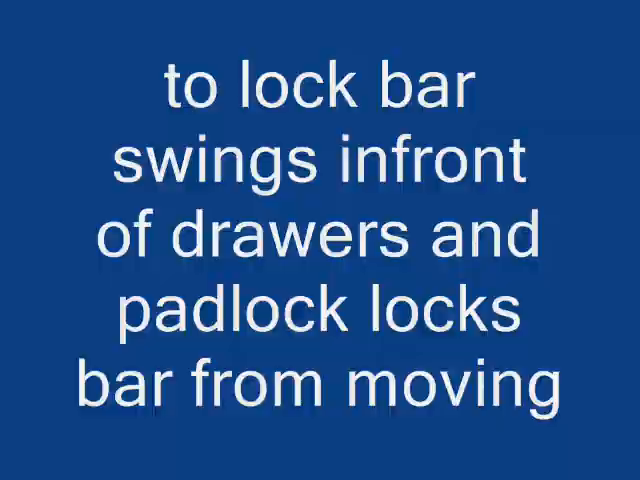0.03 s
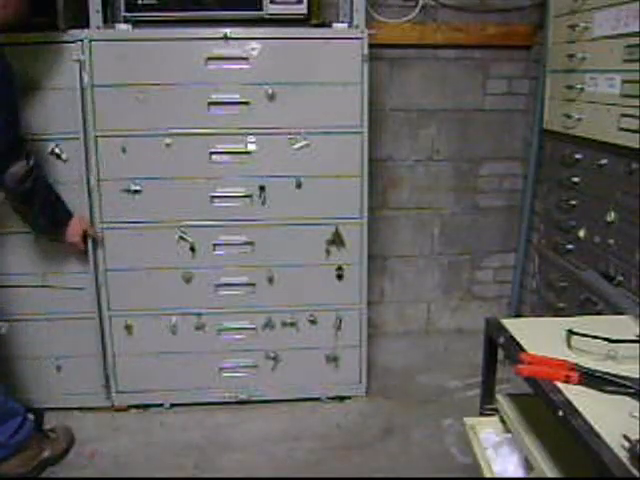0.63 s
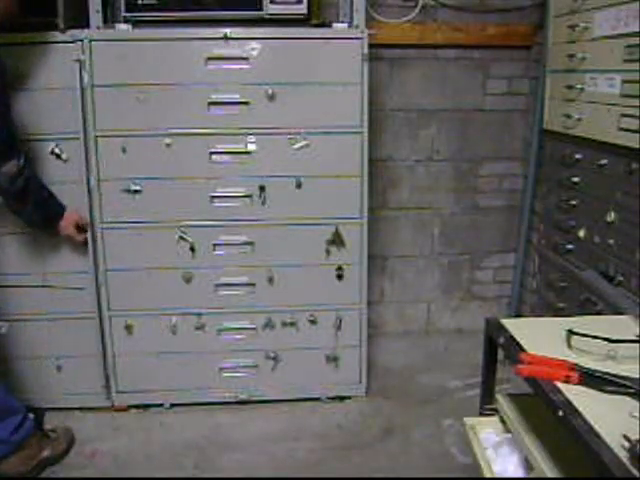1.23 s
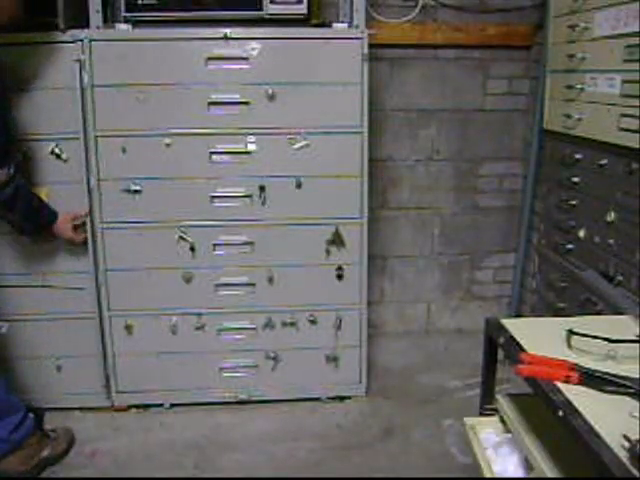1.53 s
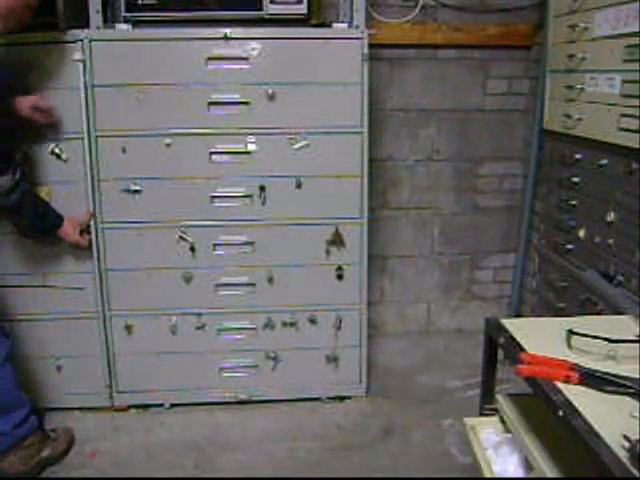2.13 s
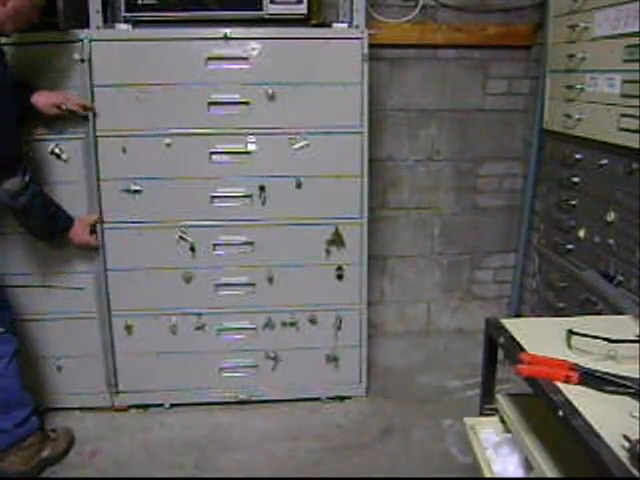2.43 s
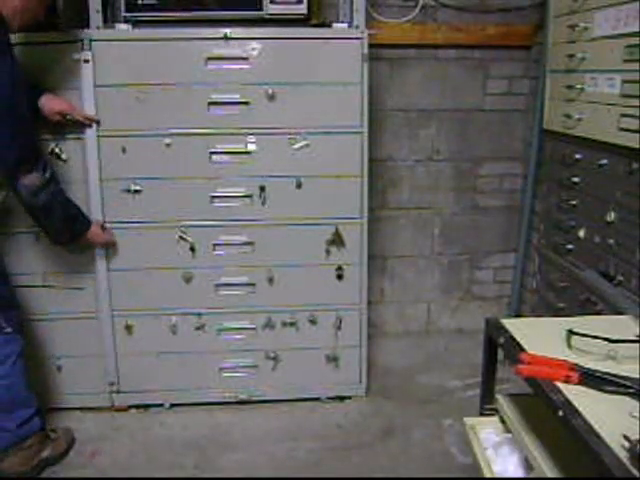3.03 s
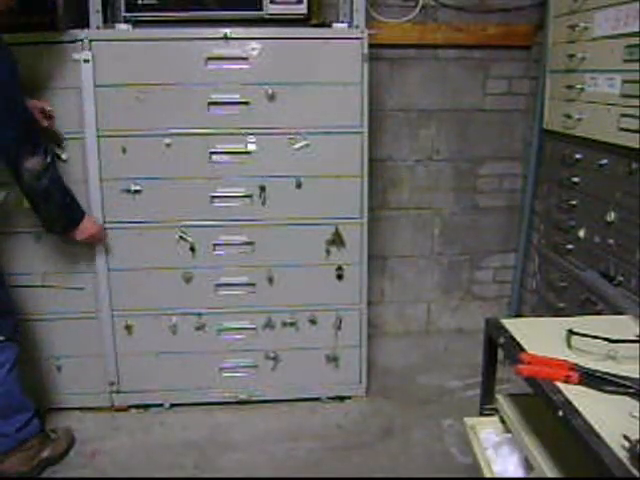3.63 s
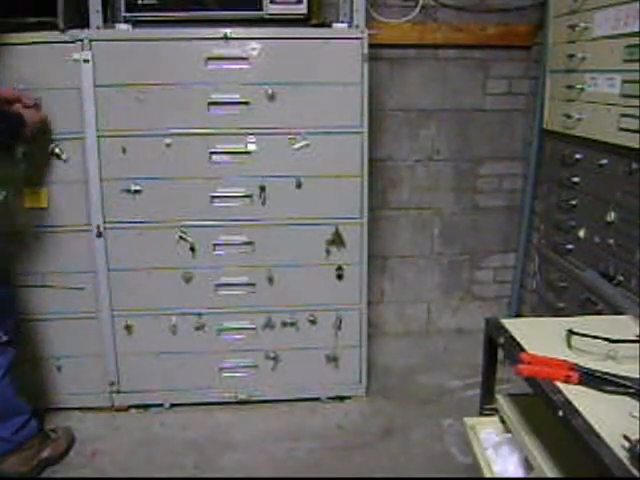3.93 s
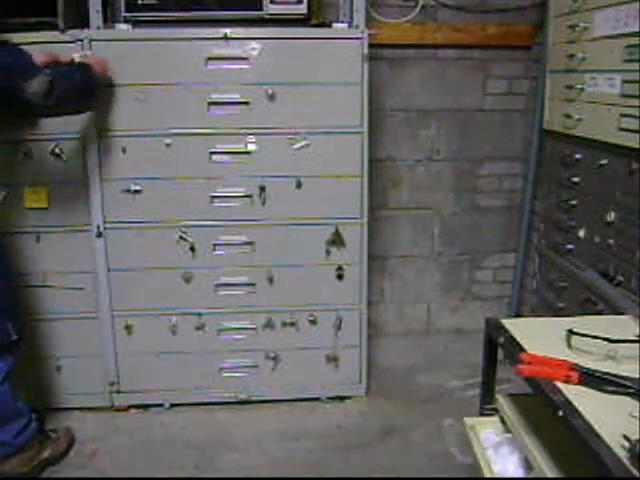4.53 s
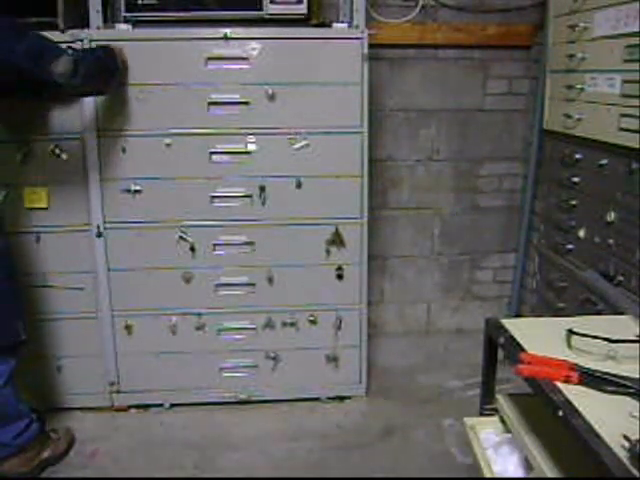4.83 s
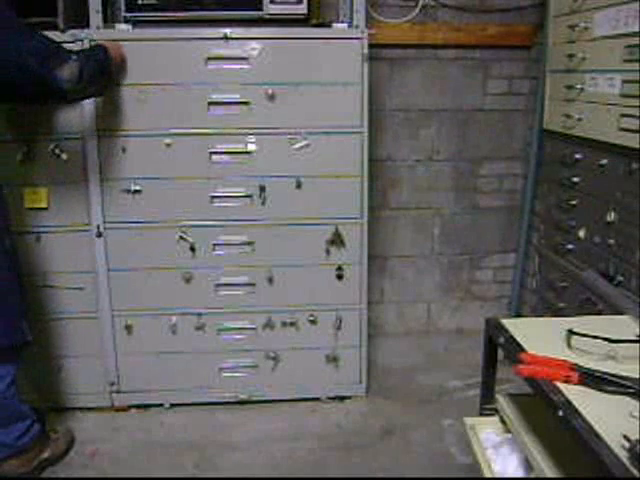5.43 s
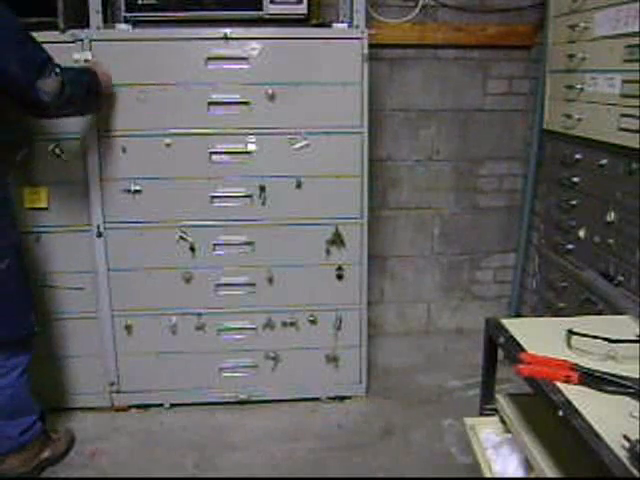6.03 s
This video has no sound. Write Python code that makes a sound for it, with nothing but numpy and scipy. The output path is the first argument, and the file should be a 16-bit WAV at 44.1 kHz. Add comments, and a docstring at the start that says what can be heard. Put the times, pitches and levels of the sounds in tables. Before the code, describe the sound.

In a hard-walled workshop, a fan runs and a low motor hum throbs. After a brief fading rush, a steel bar bangs twice against a metal cabinet, rattling the drawers, with light clicks between the blows. The hasp clacks, and a padlock is fitted with small metallic ticks that build to a sharp final clack. The low-quality microphone overloads on the heavy blows and adds a harsh edge.

```python
"""Barring and padlocking a steel cabinet

A steel security bar swings against a sheet-metal drawer cabinet, is pushed onto its hasp and padlocked.
Each knock rattles the cabinet and rings in a block-walled workshop, over a fan and a beating motor hum.
A small camera with a low sample rate starts on a fading rush and overloads on the heavy blows."""
import sys
import numpy as np
from scipy import signal
from scipy.fft import rfft, irfft
from scipy.io import wavfile
from scipy.ndimage import uniform_filter1d

SR = 44100
rng = np.random.default_rng(int(sys.argv[2]) if len(sys.argv) > 2 else 0)


def generate_wav(signal):
    """Clip the signal to [-1, 1] and save it as 16-bit WAV at the path in sys.argv[1]."""
    frames = np.transpose(np.atleast_2d(signal))
    scaled = np.clip(frames, -1, 1) * 32767
    pcm = np.round(scaled).astype(np.int16)
    wavfile.write(sys.argv[1], SR, pcm)


N = 277830
TIME = np.arange(N) / SR
START_S = 0.2285  # camera on
NOISE_TOP_HZ = 6050


def amp(db):
    """Decibels to gain."""
    return 10 ** (np.asarray(db) / 20)


def unit(x):
    """Scale to rms 1."""
    return x / np.sqrt(np.mean(x ** 2) + 1e-20)


def curve(points, hz):
    """Interpolate (Hz, value) points over log frequency."""
    point_hz, value = np.transpose(points)
    return np.interp(np.log(hz + 1), np.log(point_hz + 1), value)


def decay(t, t60_s):
    """Exponential fall, 60 dB in t60_s."""
    return np.exp(-np.log(1000) * t / t60_s)


def add(mix, at_s, sound):
    """Mix a sound in at at_s."""
    part = mix[round(at_s * SR):][:len(sound)]
    part += sound[:len(part)]


def lowpass(x, hz, taps):
    """Linear-phase low-pass."""
    return signal.oaconvolve(x, signal.firwin(taps, hz, window=("kaiser", 8), fs=SR), "same")


def noise(spectrum, peaks):
    """Steady noise, rms 1: broad spectrum plus narrow resonances."""
    hz = np.fft.rfftfreq(N, 1 / SR)
    peaks_db = sum(db / (1 + (2 * (hz - centre_hz) / width_hz) ** 2) for centre_hz, width_hz, db in peaks)
    gain = amp(curve(spectrum, hz) + peaks_db) * (hz < NOISE_TOP_HZ)
    return unit(irfft(rfft(rng.standard_normal(N)) * gain, N))


def fan(level_db=-32.5):
    """Steady fan noise with resonances."""
    # broad spectrum: (frequency [Hz], relative density [dB])
    spectrum = [(20, -12), (45, -12.5), (100, -10.5), (140, 2), (230, 3), (330, 0), (600, 2.5),
                (1080, -2.5), (1280, -8), (2000, -9), (2700, -15), (4200, -12), (5200, -15)]
    # resonances: (centre [Hz], width [Hz], boost [dB])
    peaks = [(72.6, 15, 15), (234, 34.5, 7.4), (242.7, 2.7, 2.7), (312, 6.8, 5.8), (368, 10.4, 6.7),
             (717, 16, 5.2), (802, 15, 8.9), (1111, 89, 10.2), (1814, 19, 9.6)]
    return amp(level_db) * noise(spectrum, peaks)


def motor_hum(hz=155.8, wander_hz=1.21, level_db=-43, beat_hz=1.68, beat_depth=0.74, crest_s=0.598):
    """Motor tone that beats slowly and wanders in pitch."""
    beat = 1 + beat_depth * np.cos(2 * np.pi * beat_hz * (TIME - crest_s))
    pitch_hz = hz + wander_hz * unit(uniform_filter1d(rng.standard_normal(N), size=6000))
    return amp(level_db) * beat * np.sin(2 * np.pi * np.cumsum(pitch_hz) / SR)


def whine():
    """Faint, steady high tones."""
    # sines: (frequency [Hz], rms level [dB])
    tones = [(4005, -59), (5001, -61.5)]
    return sum(amp(db) * unit(np.sin(2 * np.pi * hz * TIME)) for hz, db in tones)


def rush(level_db=-20, fade_db_per_s=33, swell_db=5, swell_at_s=0.627, swell_half_width_s=0.067):
    """Hollow, faintly ringing rush; swells once as it fades."""
    # broad spectrum: (frequency [Hz], relative density [dB])
    spectrum = [(100, -21.5), (300, -13.5), (580, -11.5), (720, -8.5), (1110, -10), (1250, -10),
                (1900, -17.5), (3200, -21.5), (4200, -20), (5200, -25)]
    # resonances: (centre [Hz], width [Hz], gain [dB])
    peaks = [(694, 27, 11), (790, 39, 8), (848, 22, 15), (996, 44, 8.5), (1094, 37, 16.5), (2900, 48, 11.5),
             (3560, 60, -4), (3720, 70, 6), (4000, 62, 7), (4140, 45, 2)]
    fade_db = fade_db_per_s * np.maximum(TIME - START_S, 0)
    swell = np.exp(-((TIME - swell_at_s) / swell_half_width_s) ** 2)
    return amp(level_db - fade_db + swell_db * swell) * noise(spectrum, peaks)


def ring(modes, spread_db=1.5, rise_s=0.00087, wobble_hz=11):
    """Modes of a steel part; weights vary per strike, pitch wavers slightly as heard through the room."""
    hz, db, t60_s = np.transpose(modes)[:, :, None]
    t = TIME[:SR]
    wobble = np.repeat(rng.standard_normal((len(hz), 100)), SR // 100, axis=1)  # 10 ms steps
    cycles = np.cumsum(hz + wobble_hz * wobble, axis=1) / SR + rng.random(hz.shape)
    weights = amp(db - spread_db * rng.standard_normal(hz.shape))
    waves = np.sin(2 * np.pi * cycles) * decay(t, t60_s)
    attack = 1 - np.exp(-t / rise_s)
    return (weights * waves).sum(0) / np.sqrt(np.sum(weights ** 2) / 2) * attack


def ping(hz, spread=0.0462, count=5, t60_s=0.085):
    """Small struck part: a tight cluster of short modes."""
    offsets = np.linspace(-1, 1, count) + rng.uniform(-0.24, 0.32, count)
    return ring([(mode_hz, 0, t60_s) for mode_hz in hz * (1 + spread * offsets)])


def snap(band_hz=(3600, 5300), t60_s=0.019):
    """Brief, bright crack of steel meeting steel."""
    band = signal.butter(3, band_hz, "bandpass", fs=SR, output="sos")
    age = np.log(1000) * TIME[:SR] / t60_s  # in time constants
    return unit(signal.sosfilt(band, rng.standard_normal(SR))) * age * np.exp(1 - age)


def contact_db(hz, thud_db, clang_db, edge_db):
    """Spectral tilt set by where and how squarely a blow lands."""
    tilt = [(500, thud_db), (1150, clang_db), (1550, clang_db), (2400, 0), (3200, 0), (4500, edge_db)]
    return curve(tilt, hz)


def clatter(thud_db, clang_db, edge_db, rise_s=0.00022, t60_s=0.17, room_db=-7, room_rise_s=0.012):
    """Dense, short sheet-metal modes plus a room tail, longest in the bass."""
    # sheet steel in the room: (band centre [Hz], relative density [dB], room t60 [s])
    bands = [(40, -32, .35), (80, -17, 0.88), (141, -1, 0.69), (252, -11, 1.15), (410, 0, 0.87),
             (870, -0.5, 0.85), (1375, 7.5, 0.29), (2000, -0.5, 0.47), (2980, 3.5, 0.39), (3580, 1, 0.38),
             (3900, 4.5, 0.47), (4770, 2.5, 0.33)]
    centres_hz, steel_db, room_t60s = np.transpose(bands)
    t, hz = TIME[:SR], np.fft.rfftfreq(SR, 1 / SR)
    colour = amp(curve(np.c_[centres_hz, steel_db], hz)) * (hz < NOISE_TOP_HZ)
    contact = amp(contact_db(hz, thud_db, clang_db, edge_db))
    spectrum = rfft(rng.standard_normal(SR)) * unit(colour) * contact
    direct = decay(t, t60_s)
    out = np.zeros(SR)
    for share, room_t60_s in zip(np.eye(len(bands)), room_t60s):
        band = irfft(spectrum * curve(np.c_[centres_hz, share], hz), SR)
        room = amp(room_db) * (1 - np.exp(-t / room_rise_s)) * decay(t, room_t60_s)
        out += band * np.hypot(direct, room)
    return out * (1 - np.exp(-t / rise_s))


def hasp_knock(thud_db, clang_db, edge_db, snap_db=-6, ring_db=-9):
    """One contact on the hasp: drawer-front clatter, crack and ring."""
    # modes of hasp and drawer fronts: (frequency [Hz], relative level [dB], t60 [s])
    hasp_modes = [(1125, 5.5, 0.82), (1224, 6, 0.3), (1340, -4, 0.08), (1390, 2, 0.43), (1630, -1, 0.4),
                  (1690, 7.5, 0.49), (1900, -11, 0.088), (2300, 12, 0.4), (2500, 2, 0.7),
                  (2697, 16.5, 0.25), (3310, 15.5, 0.3), (4030, -4, 0.37), (4070, 22, 0.24),
                  (4330, -17.5, .3), (4700, -28, .22), (4860, -28, .22)]
    tilted = [(hz, db + contact_db(hz, thud_db, clang_db, edge_db), t60_s) for hz, db, t60_s in hasp_modes]
    drawers = clatter(thud_db, clang_db, edge_db, rise_s=0.00085)  # slower to start rattling
    return drawers + amp(snap_db + edge_db) * snap() + amp(ring_db) * ring(tilted)


def padlock(settle_s=0.008, settle_thud_db=2.5, settle_edge_db=-3.5):
    """Hasp and padlock parts strike and ping, then settle with a duller knock."""
    # contacts: (time [s], level [dB], settling knock [dB], low thud [dB], mid clang [dB],
    # bright edge [dB], ping pitch [Hz], ping [dB])
    clicks = [(2.113, -35, -11, 7, 7, -9, 2500, -4), (2.170, -20.5, -1.5, 3.5, 0, -5.5, 2870, -1),
              (2.418, -33, 0, -12, -4, 2, 3970, 2), (3.354, -27, 8, -4, 6, 5, 1390, -1),
              (3.368, -10, -3, 0, 2.5, 5.5, 5120, 6), (3.682, -30, -15, -11, -1, -2.5, 1434, 2.5),
              (4.728, -30.5, -5, 13, 8, 1.5, 1400, -13), (4.843, -25, -21, 7, 0, 2, 4340, 3),
              (5.115, -20.5, -3, 6.5, 6, 6.5, 5000, 4), (5.297, -35, -5, 13, 9.5, 1.5, 1420, -6),
              (5.464, -33.5, -4, -14, 7, -5, 4460, 0), (5.537, -24.5, -12, 6, 5.5, 4.5, 1374, 4.5),
              (5.824, -31, 1.5, 10, 16, 6.5, 1596, 0), (5.846, -15.5, 7.5, 0.5, 2, 7, 5100, 9),
              (6.072, -38.5, -8, -4, 13, 8, 4330, -8), (6.108, -17, 2.5, -6, 2.5, 5, 4740, 3),
              (6.157, -7.5, -5, 0, -1.5, 1.5, 1940, -2)]
    out = np.zeros(N)
    for at_s, db, settle_db, thud_db, clang_db, edge_db, ping_hz, ping_db in clicks:
        strike = hasp_knock(thud_db, clang_db, edge_db) + amp(ping_db) * ping(ping_hz)
        settle = hasp_knock(thud_db + settle_thud_db, clang_db, edge_db + settle_edge_db)
        add(out, at_s, amp(db) * strike)
        add(out, at_s + settle_s, amp(db + settle_db) * settle)
    return out


def security_bar(contacts=4, snap_db=-12):
    """Each blow is a quick run of rebounds; side panel and bar ring on."""
    # bar on cabinet: (time [s], level [dB], rebound gap [s], change per rebound [dB], low thud [dB],
    # mid clang [dB], bright edge [dB], panel ring [dB], bar ring [dB])
    blows = [(0.992, -17, 0.0094, 0, -5, 5.5, -10, -7, -11), (1.035, 5.5, .011, -4, 0.5, -3, 0, -7.5, -20),
             (2.617, -16, .003, -2.5, 4, 2, -1, -22, 1), (2.628, -4, .016, -0.5, 2, -1.5, 5.5, -11.5, -4),
             (2.718, -16, .0038, 2.5, -17, 1, 3, -29, -19)]
    # side panel modes: (frequency [Hz], relative level [dB], t60 [s])
    panel_modes = [(356, -15, .7), (433, -13, .55), (480, -14, .65), (525, -14, .5), (574, -14, .5),
                   (700, -14, .55), (1077, -17, .7), (1865, -10, .3), (2218, -11, .4), (2589, -11, .4),
                   (2700, -5, .28), (2723, -2, .28), (2785, -4, .28), (2907, -3, .3), (3140, -7, .3),
                   (3336, -3, .29), (3622, -5, .28), (3821, -6, .28), (3931, 0, .33), (3962, -4, .28),
                   (4032, -5, .35), (4112, -2, .3), (4231, -6, .3), (4345, -5, .3)]
    # bar modes: (frequency [Hz], relative level [dB], t60 [s])
    bar_modes = [(1021, 0, .35), (1080, -5, .35), (1440, 0, .4), (1513, -4, .35), (2698, -3, .35),
                 (2885, -9, .45), (3305, -4, .3), (3521, -3, .3), (3946, -4, .3), (4074, -2, .28),
                 (4120, -3, .28), (4268, 1, .3), (4338, -3, .3), (4581, 3, .3), (4868, -1, .28),
                 (4898, 0, .28), (4932, -2, .28)]
    out = np.zeros(N)
    for at_s, db, gap_s, change_db, thud_db, clang_db, edge_db, panel_db, bar_db in blows:
        for k in range(contacts):
            impact = clatter(thud_db, clang_db, edge_db) + amp(snap_db) * snap()
            ringing = amp(panel_db) * ring(panel_modes) + amp(bar_db) * ring(bar_modes)
            add(out, at_s + k * gap_s, amp(db + k * change_db) * (impact + ringing))
    return out


def scene():
    """Workshop mix, mono."""
    return (security_bar() + padlock() + motor_hum() + fan() + whine() + rush())[None]


def record(dry, input_hz=5350, hold_samples=4, ceiling=0.99, output_hz=15650):
    """Camera starts, samples slowly and overloads; sample-and-hold mirrors the sound into the treble."""
    heard = lowpass(dry[0], input_hz, taps=121) * (TIME > START_S)
    samples = np.clip(heard[::hold_samples], -ceiling, ceiling)
    held = np.repeat(samples, hold_samples)[:N]
    return lowpass(held, output_hz, taps=511)[None]


dry = scene()
out = record(dry)
generate_wav(out)
```